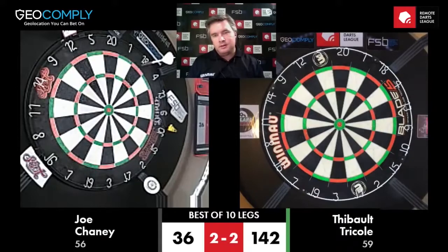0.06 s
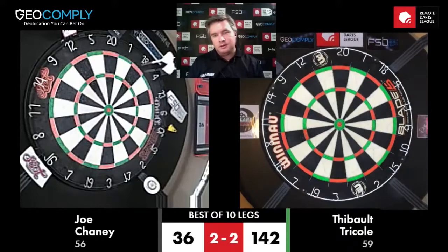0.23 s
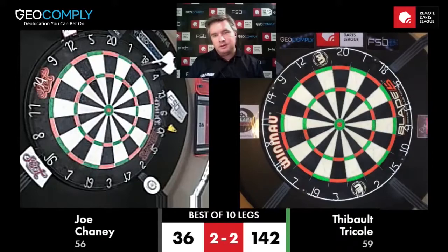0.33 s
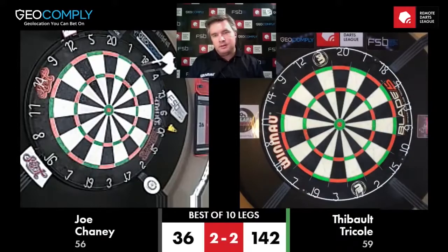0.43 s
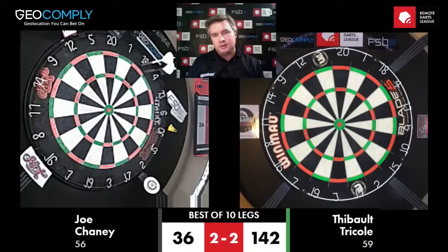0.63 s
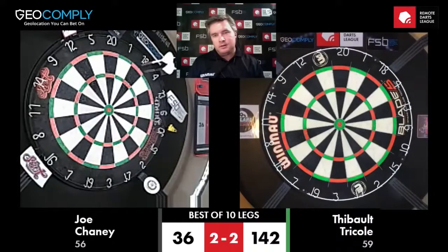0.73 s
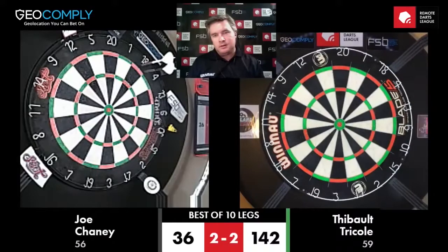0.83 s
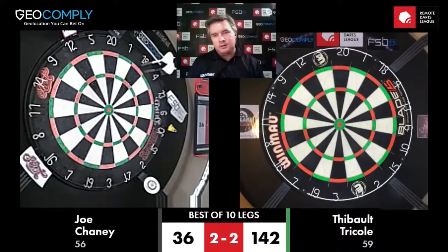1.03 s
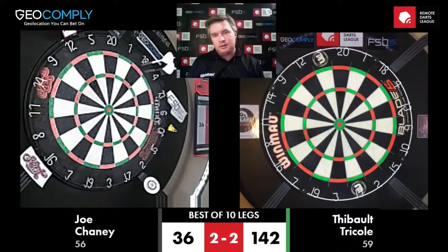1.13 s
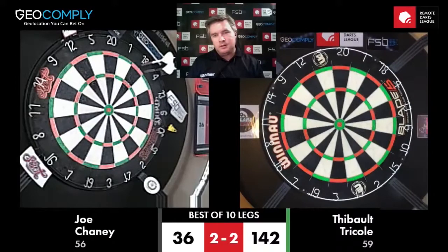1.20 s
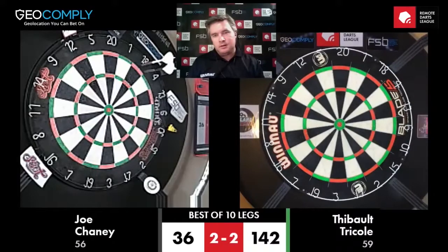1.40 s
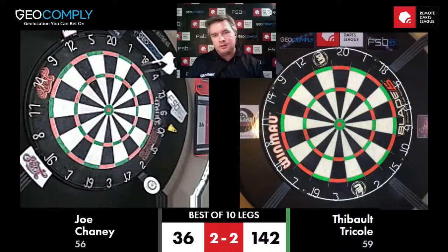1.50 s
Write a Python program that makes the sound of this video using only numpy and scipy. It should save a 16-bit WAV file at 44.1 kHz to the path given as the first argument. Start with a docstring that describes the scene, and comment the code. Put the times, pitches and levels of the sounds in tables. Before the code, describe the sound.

A single steel-tip dart hits a bristle dartboard in a small room. Faint room noise first, then at about 0.2 seconds sharp metallic ticks rattle into a loud, crunchy, woody thud, slightly clipped by a close, dull microphone. A short echo and low boom follow; by 0.4 the background drops to thin hiss as the boom fades, and quiet room noise returns around 0.9.

```python
"""Dart into a bristle board

A steel-tip dart hits a bristle board in a small room, close to a narrow-band microphone that overloads.
Ticks of shaped noise rattle into the thud: noise crack and crunch, a short sine knock, decaying modes.
Filtered noise makes the room echo, and two low modes leave a beating boom.
After the hit all but the boom dips for half a second, leaving a thin hiss."""
import sys
import numpy as np
from scipy import signal
from scipy.fft import rfft, irfft
from scipy.io import wavfile

SR = 44100
rng = np.random.default_rng(int(sys.argv[2]) if len(sys.argv) > 2 else 0)


def to_wav(sig):
    """Store sig (one row per channel, or 1-D mono) as 16-bit WAV at the path in sys.argv[1].

    Samples outside -1..1 are clipped; the rate is SR.
    """
    pcm = np.clip(np.atleast_2d(sig), -1, 1) * 32767
    pcm = np.round(pcm).astype(np.int16)
    wavfile.write(sys.argv[1], SR, pcm.T)  # frames by channels


N = 68355
THUD_S = .2160  # start of the board, echo and boom


def undb(db):
    """Decibels to gain."""
    return 10 ** (np.asarray(db) / 20)


def on_log_axis(hz, points, column=1):
    """One column of a table over frequency, interpolated on a log-frequency axis."""
    points = np.array(points)
    return np.interp(np.log(np.maximum(hz, 1)), np.log(points[:, 0]), points[:, column])


def tint(x, colour):
    """Give a sound a spectrum; white noise keeps its level."""
    gain = undb(on_log_axis(np.fft.rfftfreq(N, 1 / SR), colour))
    gain_rms = np.sqrt(np.mean(gain ** 2))
    return irfft(rfft(x) * gain / gain_rms, N)


def noise(colour):
    """Steady noise of about unit rms with the given spectrum."""
    return tint(rng.standard_normal(N), colour)


def since(start_s):
    """Seconds since a moment, zero before it."""
    return np.maximum(np.arange(N) / SR - start_s, 0)


def fade(start_s, t60_s, rise_s):
    """Envelope that builds up exponentially and dies away by 60 dB per t60."""
    age = since(start_s)
    build_up = 1 - np.exp(-age / rise_s)
    decay = np.exp(-np.log(1000) * age / t60_s)
    return build_up * decay


def ring(start_s, hz, db, t60_s, rise_s):
    """One struck mode: a sine that builds up and decays."""
    return undb(db) * fade(start_s, t60_s, rise_s) * np.sin(2 * np.pi * hz * since(start_s))


def low_pass(x, hz):
    """Steep elliptic low-pass."""
    return signal.sosfilt(signal.ellip(8, .2, 70, hz, fs=SR, output="sos"), x)


def room_air():
    """Steady room noise, strongest in the lows."""
    # spectrum of the room noise: pitch_hz [Hz], level_db [dB per Hz, relative]
    air_colour = [(20, -50.5), (66, -40), (88, -2), (120, 1), (180, 1), (300, -7), (600, -11),
                  (1200, -17.5), (2500, -24), (5000, -38), (8000, -43)]
    return undb(-52) * noise(air_colour)


def dart_ticks():
    """Sharp contacts of point, shaft and flight: one bright noise under a burst envelope per contact."""
    # contacts of the dart: start_s [s], level_db [dB], t60_s [s]
    contacts = [(.1852, -30, 0.036), (0.189, -18, .022), (0.197, -12, 0.023), (0.1995, -5, .012),
                (0.2009, 2.5, .007), (0.2041, -9, .05), (.2110, -15, .04), (0.217, -0.5, .018),
                (0.2374, -7.5, .035)]
    # colour of a tick: pitch_hz [Hz], level_db [dB per Hz, relative]
    tick_colour = [(60, -32), (200, -19), (350, -11), (850, -4.5), (1500, -14), (2100, -4), (2700, -1),
                   (3500, 1.5), (4400, -5), (5600, -8), (7100, -4.5), (8000, -14)]
    envelope = sum(undb(db) * fade(start_s, t60_s, rise_s=.00034) for start_s, db, t60_s in contacts)
    return tint(rng.standard_normal(N) * envelope, tick_colour)


def dart_ring():
    """Ring of the dart's barrel and shaft: high modes struck together."""
    # modes of the dart: pitch_hz [Hz], level_db [dB, relative], t60_s [s]
    dart_modes = [(2740, -22.5, 0.22), (2833, -23, 0.18), (3133, -27, .28), (3210, -24, .26),
                  (3370, -22, 0.1999), (3520, -23.5, 0.33), (3650, -23.5, .24), (3696, -22.5, .25),
                  (6925, -25.5, .17)]
    start_s, gain_db = .2003, 2
    modes = sum(ring(start_s, hz, db, t60_s, rise_s=.0023) for hz, db, t60_s in dart_modes)
    return undb(gain_db) * modes


def board_crunch():
    """Dull crunch of the point sinking into the bristles: a soft-edged noise burst."""
    # spectrum of the crunch: pitch_hz [Hz], level_db [dB per Hz, relative]
    crunch_colour = [(40, -15), (130, -9), (350, 1.5), (900, 0.5), (1300, -5.5), (2100, -7.5), (3000, -22),
                     (8000, -46)]
    return undb(-3) * noise(crunch_colour) * fade(start_s=.2125, t60_s=.045, rise_s=.011)


def point_crack():
    """Crack of the point going in: a very short, hard-edged noise burst."""
    # spectrum of the crack: pitch_hz [Hz], level_db [dB per Hz, relative]
    crack_colour = [(60, -18), (250, -6), (700, 0), (1300, -2), (2100, 3), (3300, 0), (4500, -9.5),
                    (7000, -9), (8000, -19.5)]
    return undb(6) * noise(crack_colour) * fade(start_s=.2158, t60_s=.0078, rise_s=.0003)


def board_knock():
    """Compact knock as the board stops the dart: a few sine cycles under a bell-shaped swell."""
    centre_s, pitch_hz, level_db, width_s = .2225, 565, 1, .0029
    offset = np.arange(N) / SR - centre_s
    swell = np.exp(-.5 * (offset / width_s) ** 2)
    return undb(level_db) * swell * np.sin(2 * np.pi * pitch_hz * offset)


def board_ring():
    """Ring of board and mount: low modes, each with its own build-up and decay."""
    # modes of board and mount: pitch_hz [Hz], level_db [dB, relative], t60_s [s], rise_s [s]
    board_modes = [(91, -25, .6, 0.016), (129.7, -17, .3, 0.013), (163.8, -11, 0.29, 0.014),
                   (205.7, -17.5, .3, 0.0053), (289.3, -28.5, 0.54, 0.0092), (312.2, -18.5, .42, 0.0054),
                   (358.2, -19.5, .36, 0.0076), (386, -24.5, 0.49, 0.0052), (454, -13, 0.31, .003),
                   (503.6, -22, .3, .003), (568, -16, .16, .003), (699, -21, .22, 0.0023),
                   (851, -19, .18, .003), (874, -21.5, .2, .003), (943.4, -20.5, .19, 0.0026)]
    gain_db = 3.5
    modes = sum(ring(THUD_S, hz, db, t60_s, rise_s) for hz, db, t60_s, rise_s in board_modes)
    return undb(gain_db) * modes


def room_echo():
    """Dense reflections of the thud: each quarter octave decays at its own rate, the lows build up late."""
    # room echo: pitch_hz [Hz], level_db [dB per Hz, relative], t60_s [s]
    room = [(30, -8, .65), (60, -9, .62), (128, .5, .5), (251, -1.5, .45), (479.3, -2.5, .28),
            (755, -3, .26), (1100, -5.5, .28), (1600, -7, 0.33), (2080, -4, .28), (2700, -3.5, 0.3),
            (3170, -1, .34), (3850, -2, .33), (4300, -9, 0.25), (5500, -10.5, 0.25), (7000, -4, 0.2),
            (8000, -14.5, .22)]
    level_db, rise_s, rise_cycles = -6, .005, 2.5
    spectrum = rfft(noise(room))
    bin_hz = np.clip(np.fft.rfftfreq(N, 1 / SR), 60, 8000)
    centres = 2 ** (np.round(4 * np.log2(bin_hz)) / 4)  # nearest quarter-octave centre of each bin
    tail = np.zeros(N)
    for hz in np.unique(centres):
        band = irfft(spectrum * (centres == hz), N)
        t60_s = on_log_axis(hz, room, column=2)
        tail += band * fade(THUD_S, t60_s, rise_s + rise_cycles / hz)
    return undb(level_db) * tail


def boom():
    """Two low room resonances that linger and beat against each other."""
    # room resonances: pitch_hz [Hz], level_db [dB], t60_s [s]
    resonances = [(99, -31, .92), (122.3, -26.5, 0.63)]
    return sum(ring(THUD_S, hz, db, t60_s, rise_s=.02) for hz, db, t60_s in resonances)


def late_reflection():
    """The lows of the thud return once more as a burst of low noise."""
    # spectrum of the reflection: pitch_hz [Hz], level_db [dB per Hz, relative]
    late_colour = [(50, -40), (110, -3.5), (170, 2), (320, -10), (500, -19), (1000, -56), (4000, -74)]
    return undb(-16) * noise(late_colour) * fade(start_s=.326, t60_s=.19, rise_s=.008)


def dip():
    """Gain curve: the level sinks after the hit and comes back quickly."""
    # points of the curve: time_s [s], level_db [dB]
    dip_points = [(.315, -0.5), (.365, -9), (.385, -11.5), (.403, -22.5), (.47, -21), (.6, -19), (.9, -20),
                  (0.914, -0.5)]
    times_s, levels_db = np.array(dip_points).T
    return undb(np.interp(np.arange(N) / SR, times_s, levels_db))


def scene():
    """The hit and its room over steady room noise; all but the low boom sinks in the dip."""
    dart = dart_ticks() + dart_ring() + point_crack()
    board = board_crunch() + board_knock() + board_ring()
    room = room_air() + room_echo() + late_reflection()
    return ((dart + board + room) * dip() + boom())[None]


def record(dry):
    """The microphone adds hiss and passes a narrow band; the loudest peaks clip."""
    hiss_db, mic_hz, clip_level, top_hz = -61.5, 7494, 1, 15600
    hiss = undb(hiss_db) * rng.standard_normal(dry.shape)
    narrow = low_pass(dry + hiss, mic_hz)
    clipped = np.clip(narrow, -clip_level, clip_level)
    return low_pass(clipped, top_hz)


dry = scene()
out = record(dry)
to_wav(out)
```